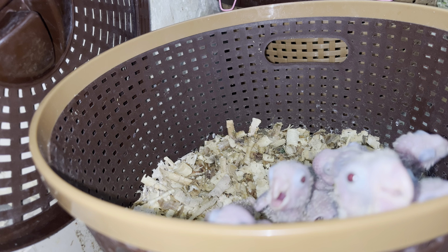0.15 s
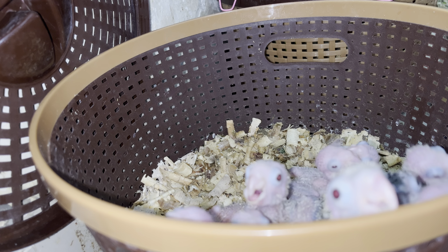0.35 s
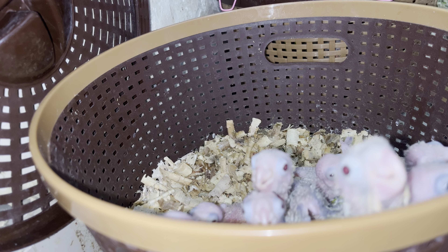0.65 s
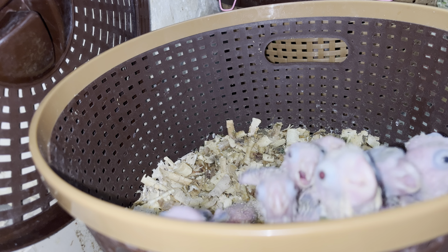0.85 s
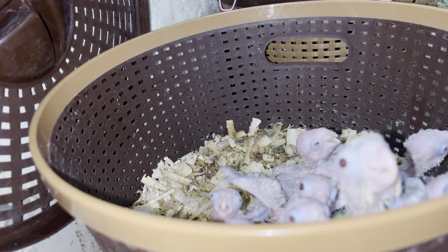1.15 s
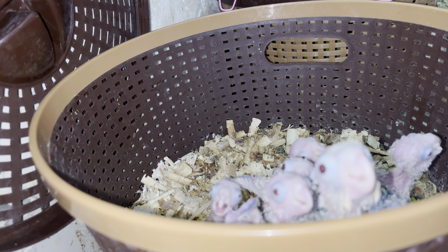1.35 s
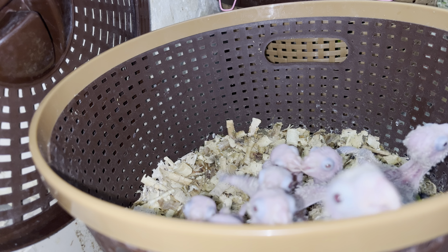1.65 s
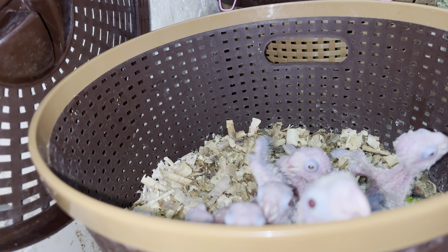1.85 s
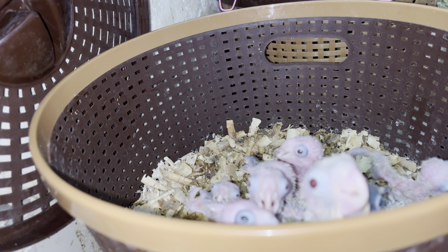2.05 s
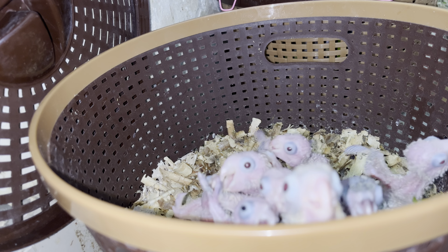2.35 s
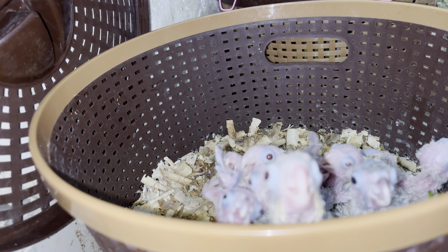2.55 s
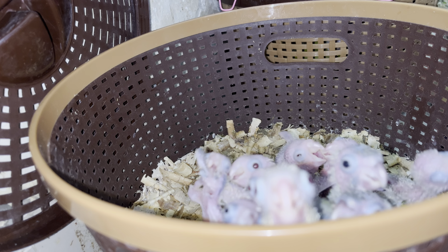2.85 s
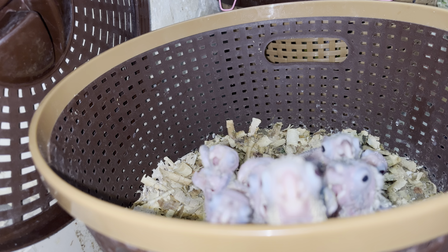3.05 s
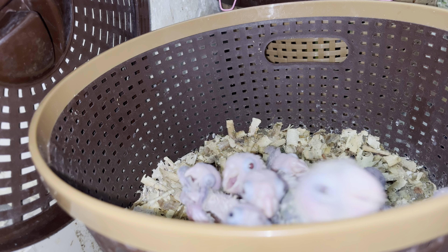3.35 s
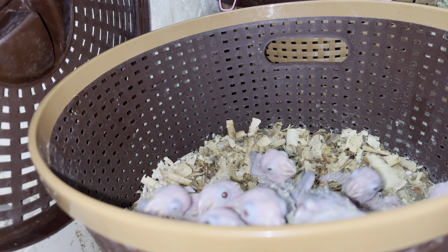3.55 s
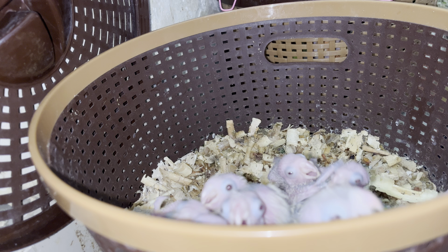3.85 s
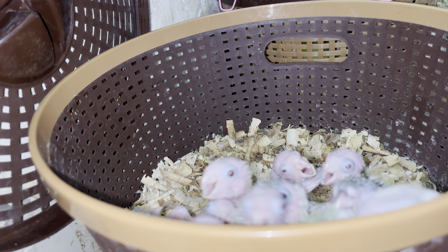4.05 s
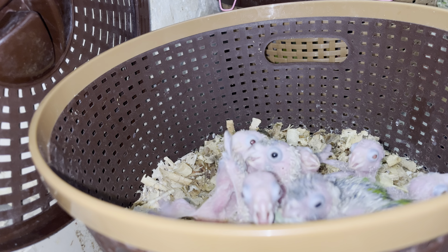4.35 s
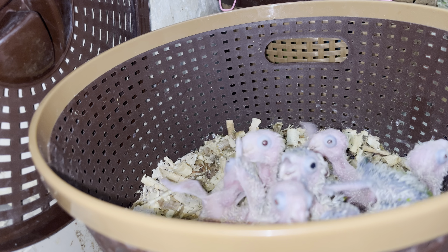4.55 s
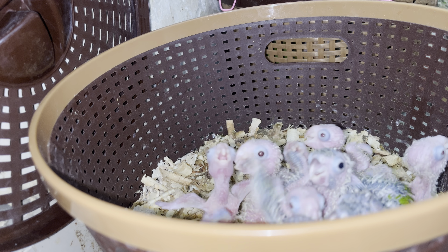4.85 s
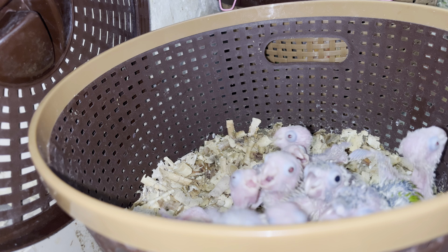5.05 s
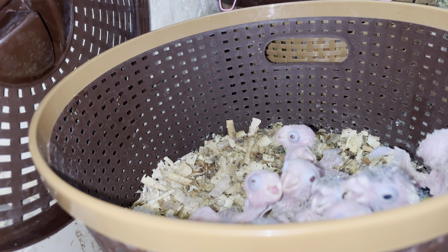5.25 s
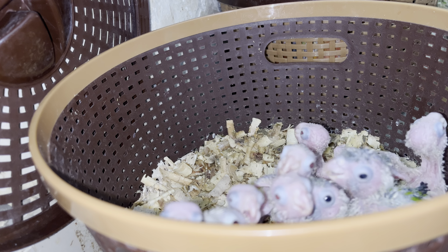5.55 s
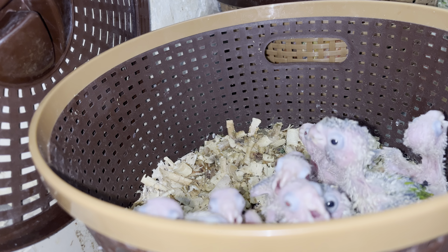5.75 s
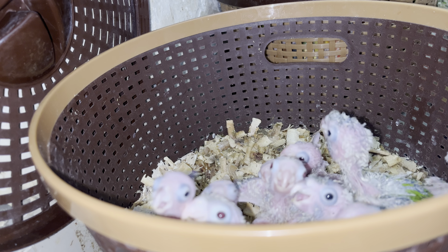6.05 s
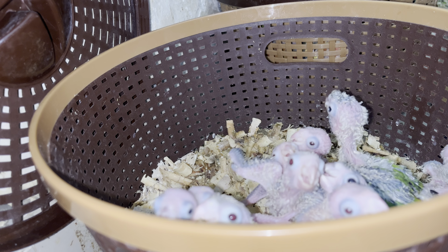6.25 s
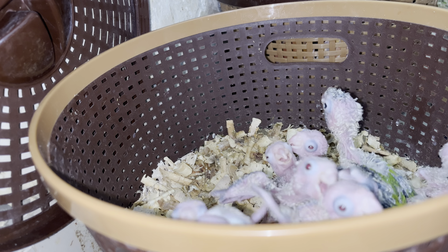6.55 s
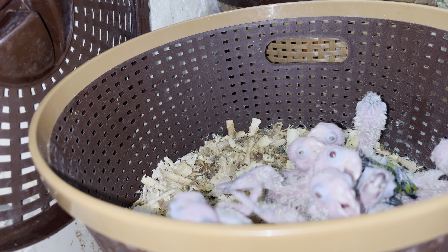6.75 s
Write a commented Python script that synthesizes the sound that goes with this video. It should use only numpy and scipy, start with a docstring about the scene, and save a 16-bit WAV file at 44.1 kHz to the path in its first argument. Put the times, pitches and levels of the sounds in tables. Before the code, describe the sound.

A brood of parrot chicks begs in a plastic basket, harsh two-tone squawks over rapid chirps, thin high peeps and hoarse rasping, close up indoors.

```python
"""In a plastic basket on wood shavings, in a small hard room, a brood of parrot chicks begs close to a two-port microphone.
An older chick gives long two-tone squawks, stacks of partials smeared by an uneven membrane.
Small chicks give short chirps coloured by the throat, and thin arched peeps, whistles with a weak octave.
Behind them a hoarse crowd rasps with hissing breath; a throat creaks in clicks, and the basket is knocked once.
Far off a machine hums: shaped noise and a wavering low drone."""
import sys
import numpy as np
from scipy import signal
from scipy.fft import rfft, irfft, next_fast_len
from scipy.io import wavfile
from scipy.ndimage import uniform_filter1d, map_coordinates

SR = 44100
rng = np.random.default_rng(int(sys.argv[2]) if len(sys.argv) > 2 else 0)


def pcm_store(signal):
    """Save signal as 16-bit PCM."""
    levels = np.round(np.clip(np.atleast_2d(signal), -1, 1) * 32767)
    wavfile.write(sys.argv[1], SR, levels.astype(np.int16).T)


N = 304290

# spectrum of the hum and room air: hz [Hz], gain_db [dB]
HUM_SPECTRUM = [(18, -86.5), (30, -44), (45, -37.5), (71, -11.5), (87, -18), (99, -16.5), (129, -9.5),
                (176, -18.5), (312, -24), (716, -29), (774, -30.5), (978, -27), (15000, -53.5)]
# course of the hum: time_s [s], level_db [dB]
HUM_LEVEL = [(0, -57), (4.6, -59), (6.9, -62)]
# left-right likeness of the hum noise: hz [Hz], correlation [-1 to 1]
HUM_LIKENESS = [(60, 0.86), (130, 1), (290, 0.71), (640, 0)]
# short chirps: start_s [s], length_s [s], first_hz [Hz], top_hz [Hz], level_db [dB],
# roughness [0-1], left_right_db [dB]
CHIRP_CALLS = [(.028, 0.027, 852, 1730, -35.5, 0, -0.5), (.125, .033, 1003, 1315, -28, 0.06, -6),
               (.155, 0.043, 958, 1837, -33, 0.26, 0), (.228, 0.045, 847, 1695, -30, 0.1, 0),
               (.293, 0.061, 1069, 1682, -28, 0.28, -3), (.408, 0.075, 950, 1550, -33, 0.37, -9),
               (.515, 0.097, 952, 1430, -37.5, 0.5, -18), (.666, 0.057, 1098, 2077, -34, 0, -12.5),
               (.8, .05, 910, 1484, -31, 0.42, 7), (.905, 0.067, 894, 1690, -25, .25, 0),
               (1.033, 0.067, 902, 1610, -27, 0.3, 5.5), (1.378, 0.069, 1249, 1661, -27, 0.07, -6.5),
               (1.488, 0.058, 1154, 1706, -29.5, 0.23, -8), (1.593, .068, 946, 1744, -28, 0.2, -6),
               (1.695, 0.06, 944, 1706, -30.5, 0.3, -3), (1.828, 0.064, 940, 1900, -32.5, .3, -1),
               (1.972, .05, 904, 1920, -32.5, 0.2, -3), (2.24, 0.094, 1004, 1661, -25, 0.42, -4),
               (2.335, 0.045, 1000, 1620, -27, 0.4, -3), (2.39, 0.066, 1007, 1680, -26.5, 0.5, -5),
               (2.552, 0.052, 950, 1685, -30, 0.18, 3.5), (2.685, 0.068, 1000, 1640, -42, .2, -20),
               (2.936, .05, 897, 1766, -33, 0.25, -5), (2.972, 0.049, 1113, 1904, -31.5, 0.15, -6),
               (3.058, 0.039, 840, 1890, -32.5, .2, -7), (3.085, 0.047, 1280, 1853, -36.5, 0.3, -2),
               (3.145, 0.057, 1053, 1760, -39, .25, -4), (3.355, 0.056, 1100, 1602, -28, 0.2, -4),
               (3.48, 0.054, 1085, 1610, -29.5, 0.2, -6.5), (3.615, 0.048, 982, 2095, -32, 0.16, -2),
               (3.722, 0.079, 998, 2335, -27, 0.06, 1), (3.868, 0.055, 997, 1900, -32, .3, -4),
               (3.978, 0.075, 1060, 1850, -28.5, .35, -5), (4.085, 0.073, 1190, 1667, -28, 0.03, -2),
               (4.33, 0.13, 5220, 5320, -25.5, 0.4, -0.5), (4.347, .075, 950, 2010, -28, 0.42, 2),
               (4.468, 0.065, 894, 1860, -37, .25, 2.5), (4.785, 0.058, 1054, 1718, -31, 0.36, 3),
               (5.025, 0.063, 1153, 1600, -30.5, 0.54, 6.5), (5.085, 0.038, 2180, 2246, -33, 0.1, 3.5),
               (5.582, 0.03, 1145, 2030, -31.5, 0, -6), (5.667, 0.047, 1565, 1622, -32.5, 0.17, -6),
               (5.692, 0.05, 1112, 1854, -29.5, 0, -3), (5.755, 0.032, 995, 1790, -30, 0.25, -4),
               (5.825, 0.046, 1107, 1950, -35.5, 0.1, -2), (5.86, 0.059, 955, 2014, -36, 0.3, -13),
               (5.945, .04, 1248, 1506, -34.5, 0.15, -14), (6.13, 0.08, 2170, 2328, -42, 0.48, 2.5),
               (6.32, 0.056, 1110, 1490, -39, 0.3, -7), (6.395, 0.035, 1115, 1740, -39.5, 0.2, 0),
               (6.5, 0.049, 1060, 1750, -32.5, 0.2, 5), (6.83, 0.067, 1173, 1686, -30.5, 0.26, -6)]
# resonances of the throat: hz [Hz], gain_db [dB]
THROAT_RESPONSE = [(410, -32.5), (700, -21), (1630, -17), (2340, -6.5), (2870, -12), (3270, -6), (5790, -1),
                   (7700, -15), (12600, -22.5), (14500, -27.5), (15500, -67.5)]
# arched peeps: start_s [s], length_s [s], top_hz [Hz], level_db [dB], left_right_db [dB]
PEEP_CALLS = [(0.039, 0.058, 5400, -31, -10), (.087, 0.058, 7670, -29, -1), (0.206, 0.068, 6290, -27.5, 3),
              (.362, .058, 7350, -36, -8), (1.009, 0.064, 7700, -32, -14), (1.122, 0.047, 7260, -30.5, 3),
              (1.276, 0.069, 7250, -29, -2.5), (1.395, .055, 6350, -23.5, 2), (1.636, 0.045, 6200, -22, 5),
              (1.997, 0.049, 7600, -26, 0), (2.123, 0.049, 7300, -27.5, 2),
              (2.153, 0.055, 6370, -24.5, 1.5), (2.826, .072, 7550, -32, 8.5),
              (2.985, 0.044, 6080, -25.5, -0.5), (3.089, .06, 6040, -38, -2),
              (3.222, 0.052, 5900, -29.5, 10), (3.773, 0.079, 7450, -26.5, -4),
              (3.91, .045, 6200, -31.5, -4), (4.042, 0.057, 5700, -29.5, -7), (4.158, 0.041, 5930, -28, 1),
              (4.657, 0.071, 6560, -26, -1.5), (4.766, 0.043, 5530, -25.5, 1.5),
              (4.8, 0.054, 7450, -37, -13), (4.918, 0.037, 6030, -25, -3), (5.604, .053, 6130, -28, -5),
              (5.665, .065, 7380, -31.5, 1), (5.791, .05, 7350, -31, 5), (5.844, .04, 5910, -23, 2),
              (5.939, 0.063, 7100, -33, 1), (6.418, 0.039, 6050, -20, -7), (6.624, .07, 7470, -32, 1)]
# bouts of the hoarse chorus: start_s [s], length_s [s], level_db [dB], swell_db over the bout [dB],
# treble_db over the level [dB]
CHORUS_BOUTS = [(0.05, 0.2, -30, 12.5, -4), (0.287, 0.17, -30, 3.5, -4), (0.53, 0.079, -29, -9.5, -7.5),
                (0.685, 0.069, -36, -12.5, -12.5), (0.755, 0.23, -35, 8.5, -6),
                (1.005, 0.13, -34, -4.5, -1.5), (1.15, 0.079, -35.5, -6.5, -1.5),
                (1.266, 0.056, -39.5, -16.5, 3.5), (1.37, 0.078, -33, 1, -2), (1.489, 0.035, -30, -3, 0.5),
                (1.58, .095, -31.5, 0.5, -11), (1.693, 0.055, -44.5, -9, -18), (1.792, 0.27, -28.5, 3, -5),
                (2.102, .4, -27.5, 1.5, -11), (2.52, 0.11, -34.5, -6, -8), (2.686, .21, -31, 3.5, -12.5),
                (2.945, 0.067, -30, -7.5, 0), (3.061, 0.16, -31, -9, -4.5), (3.216, 0.21, -29.5, -3, -4),
                (3.469, 0.042, -37, 0, 5), (3.625, 0.19, -32.5, 2.5, -5), (3.85, 0.7, -31.5, -3.5, -2),
                (4.682, .18, -34.5, 5.5, -1.5), (4.882, 0.32, -34.5, -4, -3.5),
                (5.593, 0.042, -49.5, -3, 7.5), (5.651, 0.07, -36.5, -2, -1.5),
                (5.759, 0.21, -32, -2.5, -2), (6.083, 0.15, -40, -9.5, -6.5), (6.325, 0.53, -28.5, 6, -6.5)]
# squawk notes; many squawks open on a clear low note and jump to a rough higher one:
# start_s [s], length_s [s], first_hz, middle_hz, last_hz of the fourth partial [Hz], level_db [dB],
# swell_db over the note [dB], odd_partials_db [dB], shrillness [dB per octave], roughness [0-1],
# left_right_db [dB]
SQUAWK_NOTES = [(0.783, .21, 3936, 3992, 3865, -24, 2, -0.5, 3, 0.52, 3.5),
                (1.011, 0.084, 3370, 3750, 3960, -28, -3, -4, 0, 0.7, 0),
                (1.161, 0.086, 3520, 3883, 3930, -29, -2, -23, 2, 0.8, 11),
                (1.835, 0.23, 4032, 3980, 3776, -24, -3, 1.5, 0.5, 0.52, -2.5),
                (2.433, 0.042, 3900, 3840, 3830, -22.5, 15, -0.5, -2.5, 0.64, 3),
                (2.499, 0.11, 4464, 4243, 4080, -22.5, -2, -7, -0.5, 0.77, -3),
                (2.721, 0.17, 4310, 4398, 4416, -25.5, 0, -7, -1.5, 0.48, 3),
                (3.22, 0.11, 3762, 3792, 3773, -23, 0.5, -17, -2, 0.25, 1.5),
                (3.274, 0.18, 3950, 4100, 4044, -25.5, -1.5, 1, -1, 0.5, 3.5),
                (3.623, 0.21, 4282, 4240, 3940, -24.5, -2.5, 1, 0, 0.4, -1),
                (4.135, 0.093, 3660, 3790, 3906, -26, 25, -10, 1.5, 0.3, 1),
                (4.214, .2, 3970, 4042, 3992, -23, -6, 2, -0.5, 0.7, 1.5),
                (4.882, 0.081, 3817, 3770, 3790, -20.5, 3, -12.5, 3, 0.31, 6.5),
                (4.944, 0.25, 4030, 4043, 4000, -28.5, -13.5, 5, 2, 0.58, 0.5),
                (6.278, 0.073, 3830, 3758, 3730, -36.5, 15, 1, -2, 0.25, 4.5),
                (6.338, 0.36, 3893, 3886, 3770, -27, 2.5, -6, 0.5, 0.62, -0.5),
                (6.694, 0.23, 4106, 4288, 4155, -23, 2, -4, 1, 0.88, 0.5)]
# spectrum of a squawk: multiple of the fundamental [1], level_db [dB]
SQUAWK_SPECTRUM = [(1, -36), (2, -8), (3, -11), (4, 1), (5, -14), (6, -5.5), (7, -17), (8, -16.5), (9, -20),
                   (10, -25), (11, -39), (12, -54)]
# runs of creaky throat clicks: start_s [s], length_s [s], level_db before the throat [dB]
CLICK_RUNS = [(4.607, .03, -33.5), (4.65, .01, -23.5), (4.709, .11, -21)]
# a chick knocks the basket: start_s [s], level_db [dB], resonance_hz [Hz], t60_s [s]
BASKET_KNOCK = [(4.643, -30, 417, 0.14)]
# reverberation of the room: hz [Hz], t60_s [s]
ROOM_DECAY = [(1000, 0.32), (5000, 0.3), (12000, 0.09)]
# treble at the right port: hz [Hz], phase ahead of the left [radians]
RIGHT_PORT_PHASE = [(5500, 2), (7670, 2.5), (8530, 3.8), (11100, 5.6), (13000, 7.2), (14500, 9.2)]
# balance of the ports: hz [Hz], left_right_db [dB]
PORT_BALANCE = [(60, 0.5), (110, 2.5), (200, 1.5), (380, 5), (700, 3.5), (1290, 4), (2380, 2.5), (4400, 12),
                (8120, 3.5), (15000, -2.5)]

TOP_HZ = 15760  # band limit
DROOP = .9  # share of the climb given back at the end of a chirp, in full at twice the length below
DROOP_AFTER_S = .03  # shorter chirps do not droop
PEEP_FOOT_HZ = 4790
BREAK_HZ = 6510  # register break: beyond it a high peep leaps towards its top note
BOUT_RISE_S, BOUT_FADE_DB_PER_S, TREBLE_FADE_DB_PER_S = 0.026, 248, 449
SQUAWK_RISE_S, SQUAWK_FALL_S, SQUAWK_WAVER_DB = 0.018, 0.028, 1
ODD_WAVER_DB = 6  # the odd partials come and go within a note
CLICK_GAP_S, CLICK_SCATTER_DB = .0128, 5


def amp(db):
    """Decibel law: 20 dB is a tenfold amplitude."""
    return 10 ** (np.asarray(db) / 20)


def unit(x):
    """Normalization to unit root-mean-square amplitude."""
    return x / np.sqrt(np.mean(np.abs(x) ** 2) + 1e-20)


def along(points, hz):
    """Interpolation of (Hz, value) points on a logarithmic frequency axis."""
    point_hz, values = np.transpose(points)
    return np.interp(np.log(hz + 1), np.log(point_hz + 1), values)


def wobble(rate, rows, n):
    """Band-limited fluctuation: smooth curves through random knots, rate knots a second."""
    knots = rng.standard_normal((rows, int(n * rate / SR) + 4))
    places = np.arange(n) * rate / SR
    return np.array([map_coordinates(row, [places]) for row in knots])


def filtered(x, response):
    """Linear filtering: the spectrum times a complex response of frequency."""
    m = next_fast_len(N + SR // 2)
    hz = np.fft.rfftfreq(m, 1 / SR)
    return irfft(rfft(x, m) * response(hz), m)[..., :N]


def voice(pitch, multiples, partial_db, rough, blur_hz, jitter):
    """Harmonic series: an uneven membrane shakes the pitch and smears each line into a narrow hiss."""
    n, rough = len(pitch), np.clip(rough, 0, 1)
    shaken_pitch = pitch * (1 + jitter * rough * wobble(179.1, 1, n)[0])
    cycles = np.cumsum(shaken_pitch) / SR
    smear = (wobble(blur_hz, len(multiples), n) + 1j * wobble(blur_hz, len(multiples), n)) / np.sqrt(2)
    hiss = np.clip(rough * multiples * pitch / 4000, 0, 1)  # higher partials smear more
    carriers = np.exp(2j * np.pi * multiples * cycles)
    lines = (np.sqrt(1 - hiss) + np.sqrt(hiss) * smear) * carriers
    audible = multiples * pitch < TOP_HZ
    return np.sum(amp(partial_db) * audible * lines.real, axis=0) * np.sqrt(2)


def add(bus, start_s, sound, left_right_db, rise, fall):
    """Superposition: each port gets a faded call and its basket-wall echo at delays of their own."""
    t = np.arange(len(sound)) / SR
    sound = sound * np.clip(t / rise, 0, 1) * np.clip((t[-1] - t) / fall, 0, 1)
    delays = rng.integers(0, [40, 90], size=(2, 2))  # samples: call, echo
    for port, side in enumerate((.5, -.5)):
        for delay, path_db in zip(delays[port], (0, -13)):
            begin = round(start_s * SR) + delay
            bus[port, begin:][:len(t)] += amp(path_db + side * left_right_db) * sound


def hum():
    """Partial coherence: hum noise alike at both ports in the bass, with a drone in common."""
    turn = lambda hz: np.arccos(np.clip(along(HUM_LIKENESS, hz), -1, 1)) / 2
    shape = lambda hz: amp(along(HUM_SPECTRUM, hz)) * [np.cos(turn(hz)), np.sin(turn(hz))]
    mid, side = filtered(rng.standard_normal((2, N)), shape)
    noise = unit(np.array([mid + side, mid - side]))
    drone_hz = 70 + 2.515 * wobble(4.7, 1, N)[0]
    drone = np.sin(2 * np.pi * np.cumsum(drone_hz) / SR) * amp(3.2 * wobble(6, 1, N)[0])
    level_db = np.interp(np.arange(N) / SR, *np.transpose(HUM_LEVEL))
    return amp(level_db) * (noise + amp(3.0) * drone)


def chirps(calls, throat_share):
    """Source and filter: a pitch that shoots up, holds and may droop, its partials coloured by the throat."""
    bus, multiples = np.zeros((2, N + SR)), np.arange(1, 12)[:, None]
    for start_s, length, first_hz, top_hz, level_db, rough, left_right_db in calls:
        t = np.arange(int(length * SR)) / SR
        climb = np.clip(1 - t / .026, 0, 1) ** 1.4
        droop = np.clip(1 - (length - t) / .022, 0, 1) ** 2
        droop_share = DROOP * np.clip(length / DROOP_AFTER_S - 1, 0, 1)
        pitch = top_hz - (top_hz - first_hz) * (climb + droop_share * droop)
        throat_db = throat_share * along(THROAT_RESPONSE, multiples * pitch)
        colour_db = throat_db + rng.normal(0, 1.48, multiples.shape)
        call = unit(voice(pitch, multiples, colour_db, rough, blur_hz=450, jitter=.03))
        add(bus, start_s, amp(level_db) * call, left_right_db, rise=0.007, fall=0.0091)
    return bus[:, :N]


def crowd(count):
    """Random superposition: hoarse chirps of the chicks at the back, at random moments and pitches."""
    chance = rng.random((count, 6))
    start_s = (np.arange(count) + chance[:, 0]) * N / SR / count
    length = .035 + .045 * chance[:, 2]
    top_hz = 1300 + 900 * chance[:, 1]
    level_db, rough = 6 * chance[:, 3], .4 + .5 * chance[:, 4]
    left_right_db = 8 * (chance[:, 5] - .5)
    rows = [start_s, length, .6 * top_hz, top_hz, level_db, rough, left_right_db]
    return chirps(np.transpose(rows), throat_share=0.98)


def peeps():
    """Register break: a whistle with a weak octave glides up and down, and a high one leaps at the break."""
    bus = np.zeros((2, N + SR))
    for start_s, length, top_hz, level_db, left_right_db in PEEP_CALLS:
        arch = np.sin(np.pi * np.linspace(0, 1, int(length * SR)) ** 1.1) ** .9
        leap_hz = 1050 * (top_hz > 6850)
        pitch = PEEP_FOOT_HZ + (top_hz - .6 * leap_hz - PEEP_FOOT_HZ) * arch
        if leap_hz:
            upper_pitch = top_hz - .4 * (pitch.max() - pitch)
            pitch = np.where(pitch > BREAK_HZ, upper_pitch, pitch)
        pitch = uniform_filter1d(pitch, size=30)
        call = voice(pitch, np.array([[1], [2]]), [[0], [-13]], rough=.1, blur_hz=250, jitter=.03)
        add(bus, start_s, amp(level_db) * call, left_right_db, rise=0.012, fall=.008)
    return bus[:, :N]


def bouts(fade_db_per_s, treble_share):
    """Exponential decay: each bout rises fast, the treble a little late, swells or sinks, then fades steadily."""
    t, gain = np.arange(SR) / SR, np.zeros(N + SR)
    for start_s, length, level_db, swell_db, treble_db in CHORUS_BOUTS:
        swell = swell_db * (np.minimum(t / length, 1) - .5)
        fade = fade_db_per_s * np.maximum(t - length, 0)
        rise = np.minimum(t / BOUT_RISE_S, 1) ** (1 + treble_share)
        gain[round(start_s * SR):][:SR] += amp(level_db + treble_share * treble_db + swell - fade) * rise
    return gain[:N]


def rasp():
    """Two-band modulation: the hoarse crowd and its hissing breath, the treble fading faster after each bout."""
    level = bouts(BOUT_FADE_DB_PER_S, treble_share=0)
    treble = bouts(TREBLE_FADE_DB_PER_S, treble_share=1)
    flutter = amp(2.0 * wobble(500, 1, N))
    breath = filtered(flutter * rng.standard_normal((2, N)), lambda hz: amp(along(THROAT_RESPONSE, hz)))
    chorus = unit(crowd(count=200)) + amp(-10) * unit(breath)
    high = lambda hz: 1 / (1 + (7400 / (hz + 1)) ** 10)
    low_part = unit(filtered(chorus, lambda hz: 1 - high(hz)))
    high_part = unit(filtered(chorus, high))
    return amp(2) * level * low_part + amp(-1.5) * treble * high_part


def squawks():
    """Period doubling: every second membrane cycle differs, so odd partials, mostly weaker, lie between even ones."""
    bus, (multiples, partial_db) = np.zeros((2, N + SR)), np.transpose(SQUAWK_SPECTRUM)[..., None]
    for (start_s, length, first_hz, middle_hz, last_hz, level_db, swell_db, odd_db, shrill_db, rough,
         left_right_db) in SQUAWK_NOTES:
        u = np.linspace(0, 1, int(length * SR))
        pitch = np.interp(u, [0, .5, 1], [first_hz, middle_hz, last_hz]) / 4  # from the fourth partial
        odd_course_db = odd_db + ODD_WAVER_DB * wobble(20, 1, len(u))
        tilt_db = shrill_db * np.log2(multiples / 4)
        colour_db = partial_db + odd_course_db * (multiples % 2) + tilt_db
        call = voice(pitch, multiples, colour_db, rough, blur_hz=290, jitter=.011)
        course_db = level_db + swell_db * (u - .5) + SQUAWK_WAVER_DB * wobble(30, 1, len(u))[0]
        add(bus, start_s, amp(course_db) * call, left_right_db, rise=SQUAWK_RISE_S, fall=SQUAWK_FALL_S)
    return bus[:, :N]


def rattle():
    """Impulse excitation: short dry noise clicks coloured by the throat."""
    bus, t = np.zeros((2, N + SR)), np.arange(SR // 10) / SR
    for start_s, length, level_db in CLICK_RUNS:
        for click_s in np.arange(start_s, start_s + length, CLICK_GAP_S):
            click_db = level_db + rng.normal(0, CLICK_SCATTER_DB) - 60 * t / 0.039
            bus[:, round(click_s * SR):][:, :len(t)] += amp(click_db) * rng.standard_normal((2, len(t)))
    throat = lambda hz: amp(.5 * along(THROAT_RESPONSE, hz)) / (1 + (2300 / (hz + 1)) ** 8)
    return filtered(bus[:, :N], throat)


def knock():
    """Damped resonance: one dull knock on plastic, a decaying noise burst through a broad resonance."""
    start_s, level_db, knock_hz, t60 = BASKET_KNOCK[0]
    burst, t = np.zeros((2, N)), np.arange(SR // 10) / SR
    burst[:, round(start_s * SR):][:, :len(t)] = amp(level_db - 60 * t / t60) * rng.standard_normal((2, len(t)))
    width_hz = 500
    return filtered(burst, lambda hz: 1j * hz * width_hz / (knock_hz ** 2 - hz ** 2 + 1j * hz * width_hz))


def room(x):
    """Reverberation: each frequency of the room's answer dies at its own speed."""
    hz, t, noise = signal.stft(rng.standard_normal((2, SR // 2)), SR, nperseg=256)
    decay = amp(-60 * t / along(ROOM_DECAY, hz)[:, None])
    tail = signal.istft(noise * decay, SR, nperseg=256)[1]
    late = np.pad(x, (200, 0))[None]  # delay in samples
    return signal.fftconvolve(late, tail / np.linalg.norm(tail[0]), axes=1)[:, :N]


def scene():
    """Stereo image: above about 8 kHz the right port carries the left's brood treble, shifted in phase;
    lower tones differ between ports."""
    brood = chirps(CHIRP_CALLS, throat_share=0.54) + peeps() + rasp() + squawks() + rattle() + knock()
    left, right = brood + amp(-3) * room(brood.sum(axis=0) / 2)
    shared = lambda hz: np.clip(1.06 / (1 + (8200 / (hz + 1)) ** 8), 0, 1)
    own_part = filtered(right, lambda hz: np.sqrt(1 - shared(hz) ** 2))
    shared_part = filtered(left, lambda hz: shared(hz) * np.exp(1j * along(RIGHT_PORT_PHASE, hz)))
    return np.array([left, own_part + shared_part]) + hum()


def record(dry):
    """Compression: keener left mid treble, gain control leaning on loud passages, soft limit and band limit."""
    ports = filtered(dry, lambda hz: amp(along(PORT_BALANCE, hz) * np.array([[.5], [-.5]])))
    memory = np.exp(-1 / (.12 * SR))  # time constant .12 s
    power = signal.lfilter([1 - memory], [1, -memory], np.mean(ports ** 2, axis=0))
    ports = ports * amp(-.15 * (10 * np.log10(power + 1e-5) + 28.5))
    ports = ports / (1 + np.abs(ports / .95) ** 14) ** (1 / 14)  # soft limit at .95
    return filtered(ports, lambda hz: hz < TOP_HZ)


dry = scene()
out = record(dry)
pcm_store(out)
```